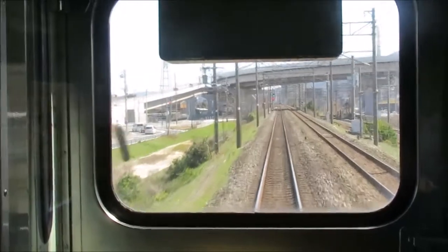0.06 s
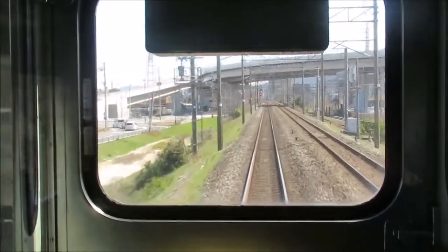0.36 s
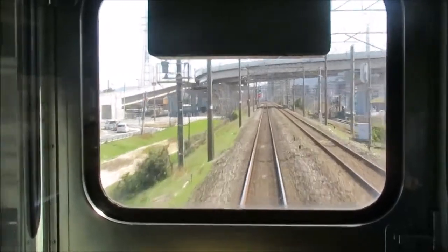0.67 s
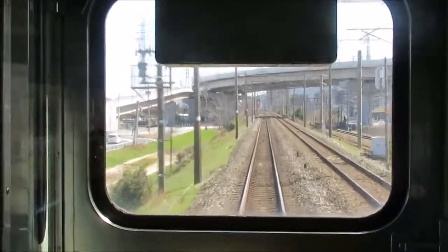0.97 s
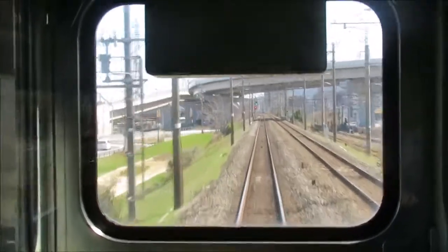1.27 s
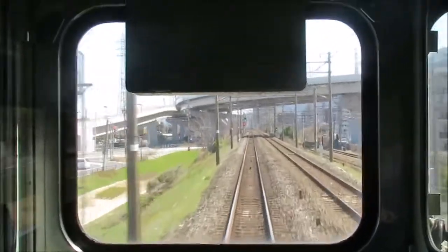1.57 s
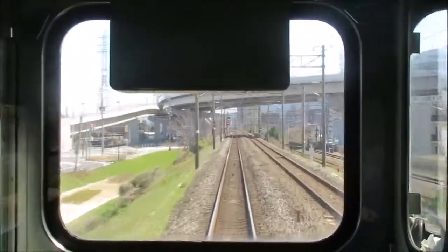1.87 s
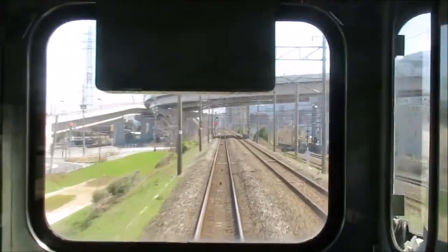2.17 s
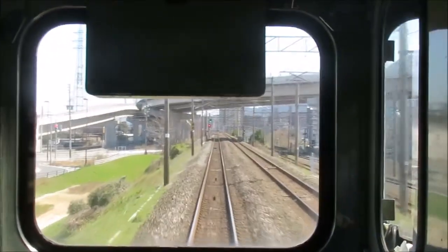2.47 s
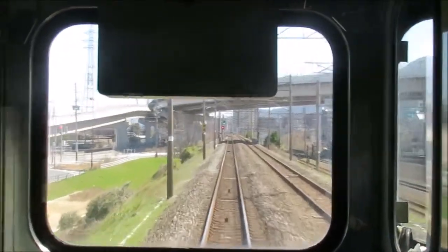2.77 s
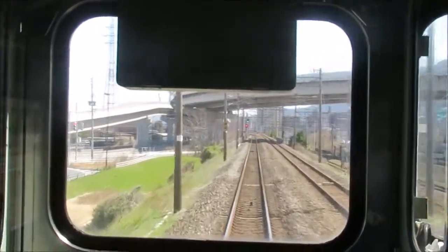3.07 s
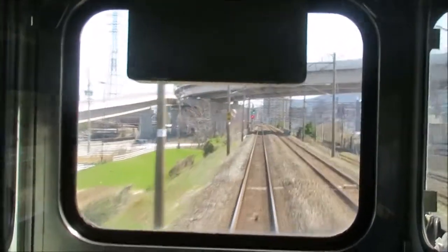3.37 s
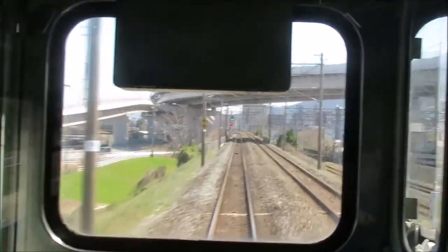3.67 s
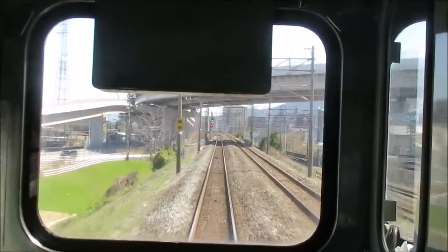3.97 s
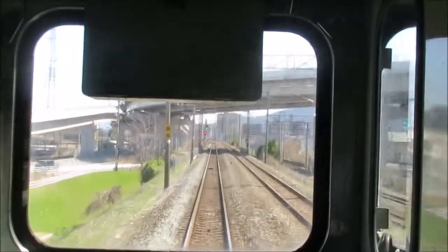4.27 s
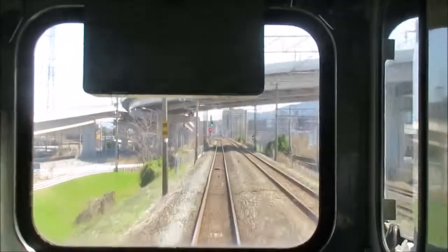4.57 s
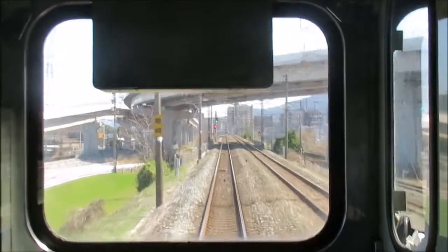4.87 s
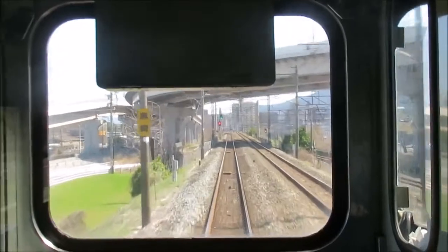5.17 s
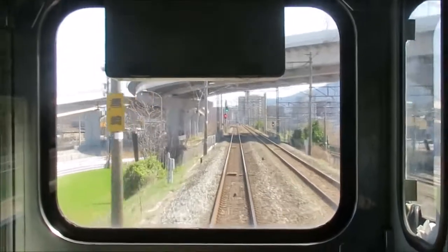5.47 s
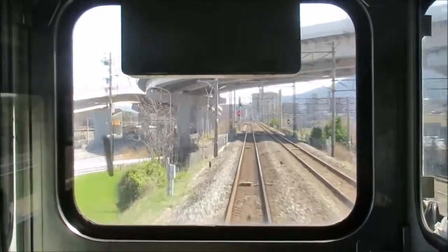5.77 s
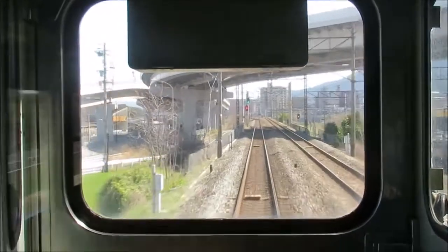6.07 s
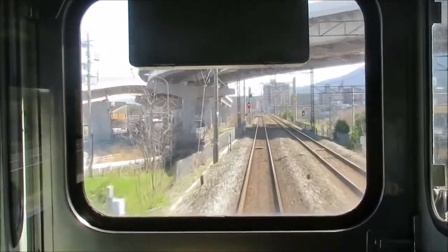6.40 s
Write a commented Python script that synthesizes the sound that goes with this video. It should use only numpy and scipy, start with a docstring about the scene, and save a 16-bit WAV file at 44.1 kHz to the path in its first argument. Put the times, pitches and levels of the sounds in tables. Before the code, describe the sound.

From a microphone in the small, hard-walled cab of a moving electric train comes a continuous low rumble with a light rush of wheels and a faint high ring. An early cluster of floor knocks and wheel clacks gives way to scattered jolts and soft, deep thuds as the car dips. Loose fittings chatter and click on the rough stretches, settling toward the end, and a small catch ticks twice.

```python
"""Inside the closed driving cab of an electric train running along the line.
The wheels make the car body boom and its panels roar, louder on rough stretches of rail, and the
steel wheels sing faintly. Dips in the track heave the car; jolts knock through the floor and clack
in the wheels. Loose fittings click and rattle, and twice a small catch ticks."""
import sys
import numpy as np
from scipy import signal
from scipy.fft import rfft, irfft, next_fast_len
from scipy.io import wavfile
from scipy.ndimage import uniform_filter1d, minimum_filter1d, map_coordinates

SR = 44100
rng = np.random.default_rng(int(sys.argv[2]) if len(sys.argv) > 2 else 0)


def store_wav(level_fs):
    """Save 16-bit WAV to argv[1]."""
    pcm = np.round(np.clip(np.atleast_2d(level_fs), -1, 1) * 32767)
    wavfile.write(sys.argv[1], SR, pcm.T.astype(np.int16))


N = 292824

# How rough the rail is. Each row: time in seconds, dB above ordinary track.
RAIL_ROUGHNESS = [(0, -1), (0.55, 2), (0.72, 3), (0.81, 8), (.88, 5), (0.96, 1.5), (1.1, -4.5), (1.33, -6),
                  (1.57, 4.5), (2.0, -2), (2.36, 2), (2.53, -3.5), (3.03, 0.8), (3.4, 2), (3.6, 0.5),
                  (3.9, 4.5), (4.08, -0.4), (4.45, -1.5), (4.66, 2.5), (4.8, -1.3), (5.25, 1.5),
                  (5.85, 0.1), (6.45, 2.5), (6.64, 0.5)]
# Pitches the steel wheels ring at. Each row: pitch in Hz, width in Hz, boost in dB.
WHEEL_RESONANCES = [(1820, 450, 3.3), (2520, 110, 3.3), (2700, 100, 1.9), (3400, 120, 1.4),
                    (4180, 200, 3.5), (4870, 220, 1.5), (5140, 260, 4)]
# The tone of chattering fittings. Each row: frequency in Hz, level in dB.
CHATTER_SPECTRUM = [(1500, -15.5), (4000, 9.5), (6500, 1.5), (9000, 0), (11000, -1.5), (14000, 1),
                    (15700, -5)]


def body():
    """The car body booms, more on rough rail and as the run goes on, and shakes on its springs."""
    # How hard the car shakes. Each row: time in seconds, level in dB.
    shaking = [(0, -30), (0.68, -22.5), (0.95, -34), (1.35, -33), (1.6, -24), (1.9, -25.5), (2.3, -21),
               (4.2, -31), (4.72, -23.5), (5.05, -28), (6.1, -25), (6.64, -22.5)]
    # The tone of the boom and of the shake. Each row: frequency in Hz, level in dB.
    boom_spectrum = [(35, -47.5), (58, -7), (80, 1.5), (100, -3.5), (135, -0.5), (160, -5.5), (190, -6.5),
                     (250, -39.5), (500, -76)]
    spring_spectrum = [(10, -17), (22, -3.5), (33, 4), (46, 14.5), (56, 16.5), (72, -21), (130, -60)]
    # Pitches the body rings at. Each row: pitch in Hz, width in Hz, boost in dB.
    resonances = [(83.4, 20, 2.5), (121, 19, 4), (153.5, 16, 6)]
    boom_db = -16 + 0.67 * over_time(RAIL_ROUGHNESS) + 0.44 * seconds_from_middle()
    boom = steadied(coloured(noise(), boom_spectrum, resonances), seconds=0.044)
    shake = steadied(coloured(noise(), spring_spectrum), seconds=0.13)
    return amp(boom_db) * boom + amp(over_time(shaking)) * shake


def thuds():
    """Each dip in the track heaves the car body for a few swings, at one of its low pitches."""
    # Each row: loudest moment in seconds, level in dB, pitch in Hz.
    dips = [(.105, -14, 124), (.645, -14, 121), (1.241, -12, 126), (1.396, -14, 94), (1.721, -12, 79),
            (1.892, -13.5, 109), (2.087, -10, 109.6), (2.171, -12, 142), (2.236, -11, 96), (2.289, -13, 62),
            (2.598, -21, 51), (2.931, -9, 80.3), (3.163, -11, 140), (3.521, -6.5, 137), (4.351, -11, 130),
            (4.729, -9, 135.5), (4.842, -10, 141), (5.044, -11, 126), (5.314, -10.5, 80.5),
            (5.418, -12.5, 85), (5.738, -7, 136), (5.799, -9.5, 136), (6.179, -16, 156), (6.564, -11, 130)]
    out, t = np.zeros((2, N)), np.arange(-SR // 10, SR // 10) / SR
    for s, db, hz in dips:
        swing = unit(np.sin(2 * np.pi * (hz * t + rng.random())))
        swell = np.exp(-.5 * (hz * t / 1.6) ** 2) * np.hanning(len(t))
        add(out, s + t[0], amp(db) * swing * swell * np.ones((2, 1)))
    return out


def rolling(flutter_db):
    """Rough rail makes the panels roar and the wheels give a rushing sound, fluttering together."""
    # The tone of the panels and of the wheels. Each row: frequency in Hz, level in dB.
    roar_spectrum = [(110, -11), (195, -2.5), (260, 0), (400, -3), (500, -4.5), (700, -10.5), (850, -11.5),
                     (1100, -18), (1400, -30.5), (2500, -50), (6000, -95.5)]
    rush_spectrum = [(500, -27), (1200, 2.5), (1900, -1.5), (2350, -1.5), (2700, -4.5), (3100, -6.5),
                     (3700, -12), (4900, -19.5), (6000, -22.5), (8000, -28), (11000, -46.5), (16000, -55.5)]
    # Pitches the panels ring at. Each row: pitch in Hz, width in Hz, boost in dB.
    panel_resonances = [(220.6, 40, 5), (277.8, 9.7, 4.5), (291.3, 12, 5), (355, 29, 6.5), (426.7, 26, 3.5),
                        (495, 47, -1.5), (534.7, 9.2, 9), (612, 21, 7), (704, 92, 4.5)]
    drive_db = over_time(RAIL_ROUGHNESS) + flutter_db * wobble(per_second=20)
    pits = impacts(per_second=320, scatter_db=1)  # small rail flaws strike panels and wheels together
    roar = steadied(coloured(noise() + .5 * pits, roar_spectrum, panel_resonances), seconds=0.087)
    rush = coloured(noise() + .25 * pits, rush_spectrum, WHEEL_RESONANCES)
    return amp(-22.5 + 0.69 * drive_db) * roar + amp(-41.5 + 0.58 * drive_db) * rush


def jolts():
    """Each jolt from below knocks the floor and makes the steel wheels clack and ring."""
    # Each row: start in seconds, knock level in dB, clack level in dB, knock pitch in Hz.
    hits = [(0.08, -8.5, -36, 278), (.272, -16, -30, 596), (.325, -10, -35, 484), (.386, -12, -36.5, 530),
            (.684, -12.5, -31, 627), (.761, -12, -27, 336), (0.788, -10.5, -23.5, 754),
            (.801, -6.5, -30.5, 249), (.833, -3.5, -29, 324), (.905, -2, -28.5, 297),
            (.935, -5.5, -27, 657), (0.963, -7.5, -32, 653), (1.358, -38, -26, 700), (1.391, -13, -34, 690),
            (1.526, -1, -30.5, 242), (1.557, -13, -33.5, 392), (1.611, -9.5, -36.5, 673),
            (1.652, -10, -31, 348), (1.712, -17.5, -28.5, 700), (2.132, -14.5, -38, 550),
            (2.238, -9, -29.5, 605), (2.353, -5.5, -29.5, 625), (2.373, -13, -39.5, 495),
            (2.602, -13, -34, 353), (2.885, -11, -35, 260), (3.143, -12, -34, 590),
            (3.271, -11.5, -35.5, 353), (3.31, -18, -31, 650), (3.344, -13.5, -28, 596),
            (3.4, -13, -30.5, 710), (3.514, -13, -34, 550), (3.749, -13, -35, 280), (3.832, -7.5, -25, 700),
            (3.88, -9, -28.5, 490), (3.991, -4, -31.5, 270), (4.486, -15.5, -46.5, 284),
            (4.613, -7.5, -33.5, 300), (4.669, -6.5, -32, 547), (4.901, -10.5, -33, 323),
            (5.15, -12, -32, 337), (5.292, -12.5, -35, 580), (5.69, -13.5, -37, 620),
            (5.821, -11, -38.5, 560), (6.066, -6, -33, 595), (6.337, -14.5, -31.5, 510),
            (6.5, -14.5, -37.5, 620), (6.552, -9, -38.5, 560)]
    # The tone of the struck floor and of a struck wheel. Each row: frequency in Hz, level in dB.
    floor_spectrum = [(30, -24.5), (80, -3), (140, 8.5), (350, 0.5), (650, -4.5), (900, -12), (1300, -21.5),
                      (2600, -44.5), (8000, -74)]
    clack_spectrum = [(700, -11), (1100, 3.5), (1500, 2.5), (1930, -1), (2200, 3.5), (2780, -21),
                      (3200, -3), (4200, -14.5), (6000, -20), (12000, -36.5)]
    out = np.zeros((2, N))
    for s, knock_db, clack_db, knock_hz in hits:
        panel = [(knock_hz, knock_hz / 2, 9)]  # the knock's own pitch stands out by 9 dB
        add(out, s, amp(knock_db) * blow(floor_spectrum, panel, fade_s=.14, rise_s=.0007))
        clack = blow(clack_spectrum, WHEEL_RESONANCES, fade_s=0.074, rise_s=.002)
        add(out, s, amp(clack_db - 3) * clack)
        add(out, s, amp(clack_db - 10) * wheel_ring())
    return out


def blow(spectrum, resonances, fade_s, rise_s):
    """A struck part rings at many pitches at once and quickly dies away; the peak is 1."""
    t = np.arange(SR // 7) / SR
    ring = steadied(coloured(noise(len(t)), spectrum, resonances), seconds=0.0044)
    burst = ring * fade(t, fade_s) * (1 - np.exp(-t / rise_s))
    return burst / np.abs(burst).max()


def wheel_ring():
    """A wheel rings on, struck at a different spot each time, so its mix of notes changes."""
    # Each row: pitch in Hz, width in Hz, level in dB.
    notes = [(1880, 130, -3), (2010, 90, -2), (2570, 140, -1), (2810, 120, -5)]
    t = np.arange(SR // 4) / SR
    ring = sum(amp(db + rng.normal(0, 2.8)) * blurred_note(hz, width, len(t)) for hz, width, db in notes)
    return unit(ring) * fade(t, .21) * (1 - np.exp(-t / .003)) * np.ones((2, 1))


def clicks():
    """A loose fitting buzzes as it works free, then snaps against its seat, and the cab answers."""
    # Each row: time of the snap in seconds, level in dB.
    strikes = [(0.084, -36.5), (0.325, -37.5), (0.411, -45), (0.651, -37), (0.762, -34), (0.798, -31.5),
               (0.8022, -37), (1.23, -43.5), (1.392, -44), (1.65, -28.5), (2.0263, -44.5), (2.314, -37.5),
               (2.355, -38.5), (2.363, -38), (2.556, -44.5), (3.344, -42), (3.5038, -44), (3.73, -43),
               (3.832, -42), (3.881, -31), (3.9908, -31), (4.21, -48), (5.424, -47.5), (5.801, -46),
               (6.0684, -49)]
    # The tone of a snap. Each row: frequency in Hz, level in dB.
    spectrum = [(600, -17), (2000, 12.5), (4500, 3.5), (7000, 0.5), (9300, -5.5), (11000, 0), (14000, -0.5),
                (16000, 0)]
    out, t = np.zeros((2, N)), (np.arange(SR // 4) - SR // 20) / SR
    snap = (t >= 0) * fade(np.abs(t), .016)
    buzz = amp(-24) * np.exp(-np.abs(t) / .017)
    for s, db in strikes:
        pitches = [(hz, 400, 4) for hz in rng.uniform(6000, 19000, size=5)]  # each rings its own way
        click = coloured(noise(len(t)), spectrum, pitches) * (snap + buzz)
        add(out, s + t[0], amp(db) * cab(click, echo_db=-1))
    return out


def catches():
    """A small catch strikes, bounces and settles, each touch with a ring and a dry scrape."""
    # Each row: start in seconds, level in dB.
    strikes = [(.68, -25), (4.7757, -18)]
    # Each row: seconds after the strike, level in dB.
    bounces = [(0, -1), (.0013, -2), (.0026, -4), (.012, -17)]
    # The catch's ring. Each row: pitch in Hz, level in dB, seconds to fade by 60 dB.
    notes = [(3990, -8, .005), (4630, -.5, .008), (5750, -22, .003), (7100, -24, .002), (9560, -21, .003),
             (10900, -18, .002), (12400, -21, .002)]
    # The tone of the scrape. Each row: frequency in Hz, level in dB.
    scrape_spectrum = [(3000, -11.5), (3900, 5), (5000, 1.5), (6200, -11.5), (12500, -17.5), (14500, -39)]
    out, t = np.zeros((2, N)), np.arange(SR // 40) / SR
    rise = 1 - np.exp(-t / 0.00026)
    for s, db in strikes:
        ticks = np.zeros((2, SR // 4))
        for delay, bounce_db in bounces:
            ring = sum(amp(note_db) * fade(t, fade_s) * np.sin(2 * np.pi * (hz * t + rng.random()))
                       for hz, note_db, fade_s in notes)
            scrape = amp(-15) * fade(t, 0.002) * coloured(noise(len(t)), scrape_spectrum)
            add(ticks, delay, amp(bounce_db) * (ring + scrape) * rise)
        add(out, s, amp(db) * cab(ticks, echo_db=-13))
    return out


def rattles():
    """A shaken fitting rattles in a swell of tiny taps; its size sets how bright they sound."""
    # Each row: loudest moment in seconds, level in dB, half length in seconds, boosted pitch in Hz.
    swells = [(0.689, -52.5, 0.028, 12040), (0.797, -40.5, .011, 11600), (0.802, -48, 0.009, 2730),
              (1.373, -46.5, 0.012, 3400), (1.42, -52, 0.021, 12100), (1.574, -49, 0.022, 5200),
              (1.661, -49, 0.023, 4000), (2.311, -51, 0.035, 12000), (2.36, -42.5, 0.01, 3870),
              (2.395, -52, 0.035, 11850), (3.357, -53.5, 0.027, 4900), (3.499, -56, 0.048, 12900),
              (3.625, -54.5, 0.037, 4950), (3.737, -55.5, .025, 12600), (3.84, -48.5, 0.011, 6000),
              (3.903, -48.5, 0.022, 12270), (4.004, -47.5, 0.021, 12000)]
    out, t = np.zeros((2, N)), np.arange(-SR // 8, SR // 8) / SR
    for s, db, half_length, hz in swells:
        taps = impacts(per_second=700, scatter_db=-1, size=len(t))
        ringing = coloured(taps, CHATTER_SPECTRUM, [(hz, .45 * hz, 7)])
        rattle = steadied(cab(ringing, echo_db=2.5), seconds=0.017)
        add(out, s + t[0], amp(db) * rattle * np.exp(-.5 * (t / half_length) ** 2))
    return out


def singing(waver_db):
    """The rolling wheels hold two faint, blurred notes, each wavering in loudness on its own."""
    # Each row: pitch in Hz, width in Hz, level in dB.
    notes = [(2545, 140, -2.5), (3315, 170, -10.5)]
    song = sum(amp(db + waver_db * wobble(per_second=3.6)) * blurred_note(hz, width)
               for hz, width, db in notes)
    return amp(-53.5 + .3 * over_time(RAIL_ROUGHNESS) + .5 * seconds_from_middle()) * song


def chatter(flutter_db):
    """Rough rail keeps three fittings ticking finely over a thin hiss; they settle over the run."""
    level_db = -62.5 + 0.73 * over_time(RAIL_ROUGHNESS) - seconds_from_middle()
    level_db += flutter_db * wobble(per_second=11)
    ticks = np.zeros((2, N))
    for _ in range(3):
        pitches = [(hz, 500, 5) for hz in rng.uniform(9000, 14500, size=3)]
        ticks += coloured(impacts(per_second=28, scatter_db=2.5), CHATTER_SPECTRUM, pitches)
    hiss = coloured(noise(), CHATTER_SPECTRUM)
    return amp(level_db) * (hiss + 1.04 * unit(cab(ticks, echo_db=12.5)))


def cab(x, echo_db):
    """The hard walls of the small cab add a short echo."""
    # Each row: frequency in Hz, seconds for the echo to fade by 60 dB.
    fade_times = [(150, .14), (1000, 0.19), (5000, 0.24), (14000, 0.08)]
    hz, t, spectra = signal.stft(noise(SR // 3), SR, nperseg=256)
    tail = signal.istft(spectra * fade(t, over_pitch(fade_times, hz)[:, None]), SR, nperseg=256)[1]
    echo = signal.fftconvolve(x, tail / np.linalg.norm(tail[0]), axes=1)
    return x + amp(echo_db) * echo[:, :x.shape[1]]


def coloured(pair, spectrum, resonances=()):
    """Give two unrelated signals a tone and blend them into left and right, at average level 1."""
    # Each row: frequency in Hz, how alike left and right are (1 the same, 0 unrelated).
    likeness = [(60, 1), (130, 1), (250, 0.98), (640, 0.92), (1400, 0.77), (3100, 0.71), (4500, 0.5),
                (6800, .3), (10000, -.15), (15000, -0.28)]

    def response(hz):
        boost_db = sum(db * hump(hz, centre, width) for centre, width, db in resonances)
        spread = np.arccos(np.clip(over_pitch(likeness, hz), -1, 1)) / 2
        return amp(over_pitch(spectrum, hz) + boost_db) * np.array([np.cos(spread), np.sin(spread)])
    mid, side = filtered(pair, response)
    return unit(np.array([mid + side, mid - side]))


def blurred_note(centre, width, size=N):
    """Noise gathered around one pitch, at average level 1."""
    return unit(filtered(rng.standard_normal(size), lambda hz: hump(hz, centre, width)))


def hump(hz, centre, width):
    """The shape of a resonance: 1 at its centre, falling away on both sides."""
    return 1 / (1 + (2 * (hz - centre) / width) ** 2)


def impacts(per_second, scatter_db, size=N):
    """Tiny hits at random times and of random strength, at average level 1."""
    struck = rng.random(size) < per_second / SR
    return unit(struck * noise(size) * amp(scatter_db * np.clip(rng.standard_normal(size), -2, 2)))


def steadied(x, seconds):
    """Even out any swells that last longer than the given time."""
    size = max(int(seconds * SR), 8)
    power = uniform_filter1d(uniform_filter1d(np.mean(x ** 2, axis=0), size), size)
    return unit(x / np.sqrt(np.abs(power) + 1e-6))


def filtered(x, response):
    """Scale each frequency in x by response(hz)."""
    n = x.shape[-1]
    padded = next_fast_len(n + 8192)
    return irfft(rfft(x, padded) * response(np.fft.rfftfreq(padded, 1 / SR)), padded)[..., :n]


def noise(size=N):
    """Two unrelated white noises."""
    return rng.standard_normal((2, size))


def wobble(per_second):
    """A smooth curve through random points."""
    return map_coordinates(rng.standard_normal(400), [np.arange(N) * per_second / SR], mode="wrap")


def fade(t, seconds):
    """A gain that drops by 60 dB in the given time."""
    return amp(-60 * t / seconds)


def over_pitch(rows, hz):
    """Read between (Hz, value) rows, with octaves evenly spaced."""
    row_hz, values = np.transpose(rows)
    return np.interp(np.log(hz + 1), np.log(row_hz + 1), values)


def over_time(rows):
    """Turn (seconds, value) rows into one value per sample."""
    return np.interp(np.arange(N) / SR, *np.transpose(rows))


def seconds_from_middle():
    """Each sample's time, counted from the middle of the run."""
    return (np.arange(N) - N / 2) / SR


def amp(db):
    """Turn decibels into a gain."""
    return 10 ** (np.asarray(db) / 20)


def unit(x):
    """Scale x to an average (root mean square) level of 1."""
    return x / np.sqrt(np.mean(x ** 2) + 1e-20)


def add(track, s, sound):
    """Mix a sound into the track at s seconds."""
    part = track[:, max(round(s * SR), 0):][:, :sound.shape[1]]
    part += sound[:, :part.shape[1]]


def scene():
    """Everything heard in the cab."""
    fittings = clicks() + chatter(flutter_db=1.5) + rattles() + catches()
    return body() + thuds() + rolling(flutter_db=1.7) + singing(waver_db=3.5) + jolts() + fittings


def record(dry):
    """A limiter briefly turns down the highest peaks, and the very top of the treble is cut off."""
    ceiling, top_hz = .95, 15720
    needed_gain = np.minimum(1, ceiling / (np.abs(dry).max(axis=0) + 1e-9))
    smooth_gain = uniform_filter1d(minimum_filter1d(needed_gain, size=SR // 100), size=SR // 100)
    edge = SR // 10
    padded = np.pad(dry * smooth_gain, ((0, 0), (edge, edge)), mode="reflect", reflect_type="odd")
    return filtered(padded, lambda hz: hz < top_hz)[:, edge:edge + N]


dry = scene()
out = record(dry)
store_wav(out)
```